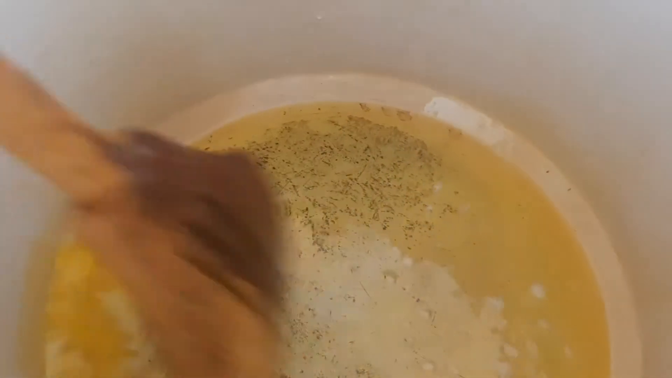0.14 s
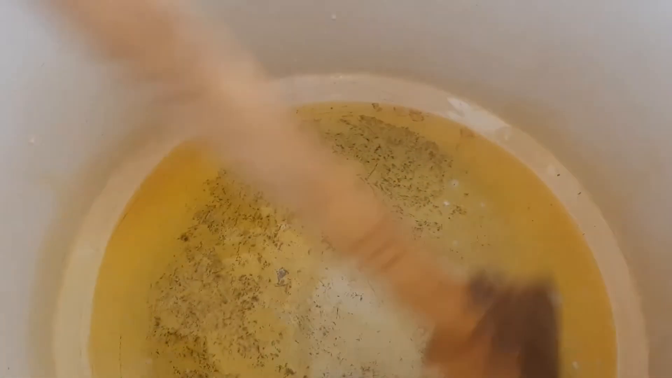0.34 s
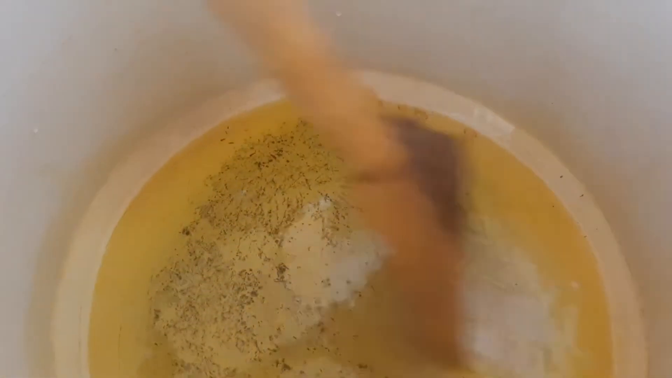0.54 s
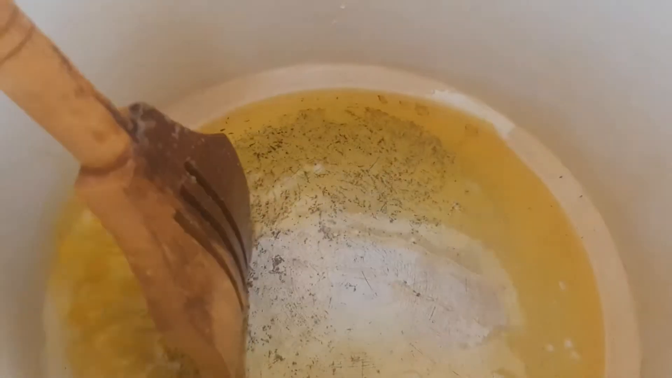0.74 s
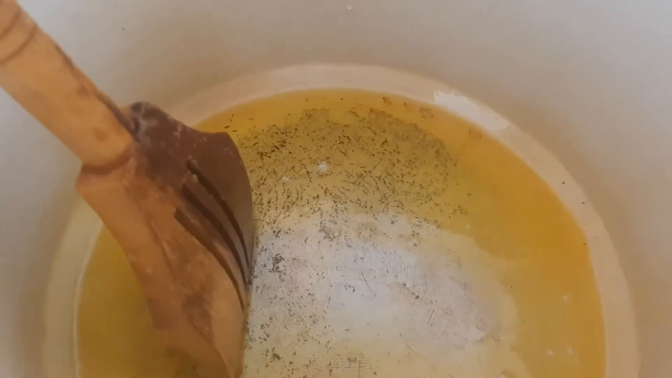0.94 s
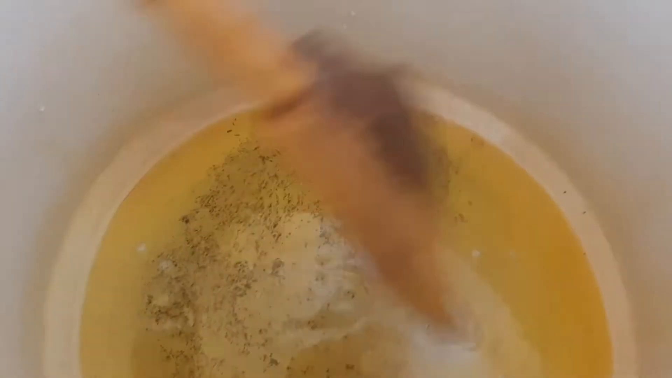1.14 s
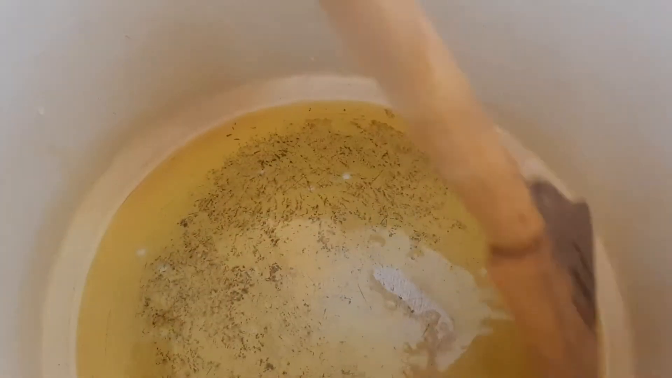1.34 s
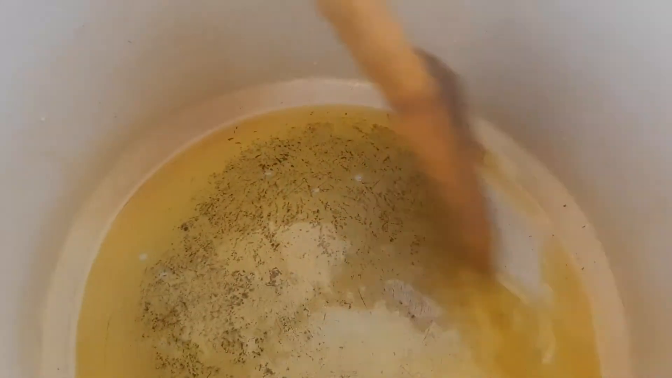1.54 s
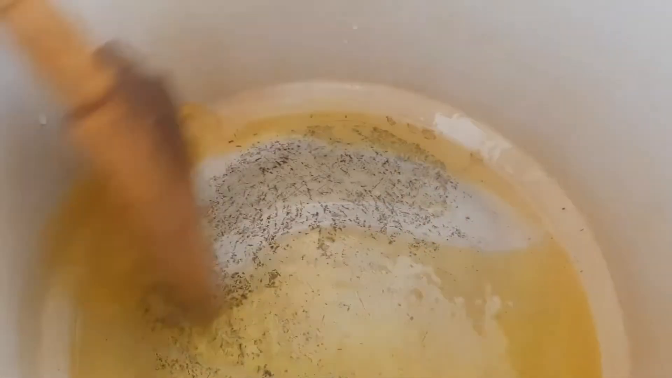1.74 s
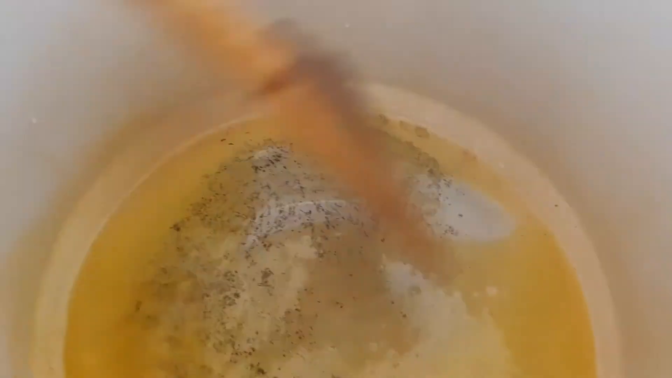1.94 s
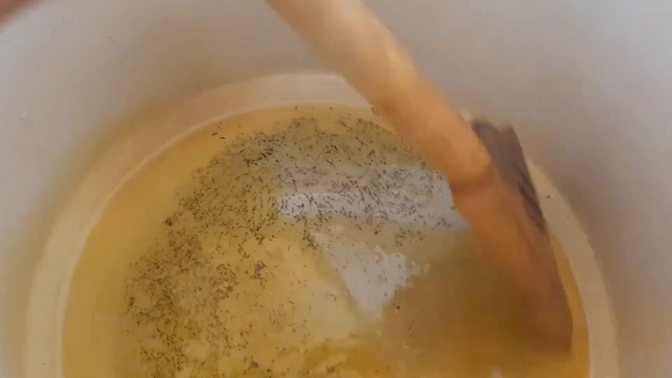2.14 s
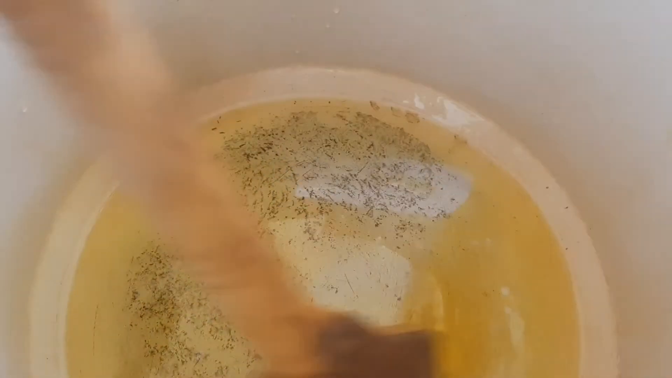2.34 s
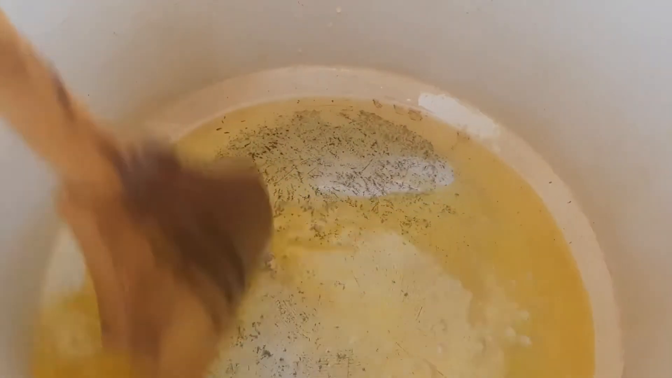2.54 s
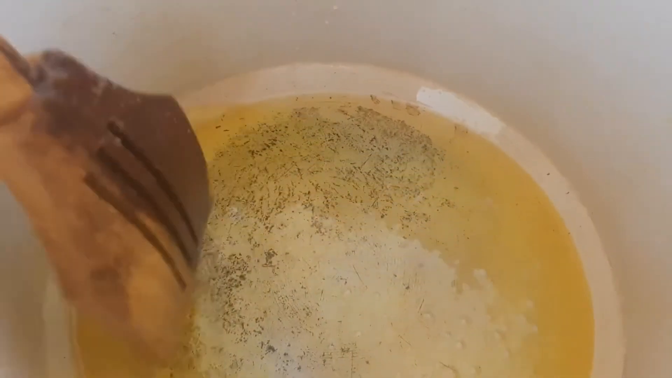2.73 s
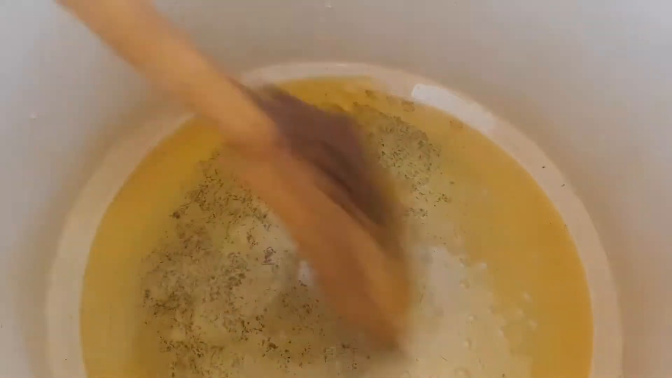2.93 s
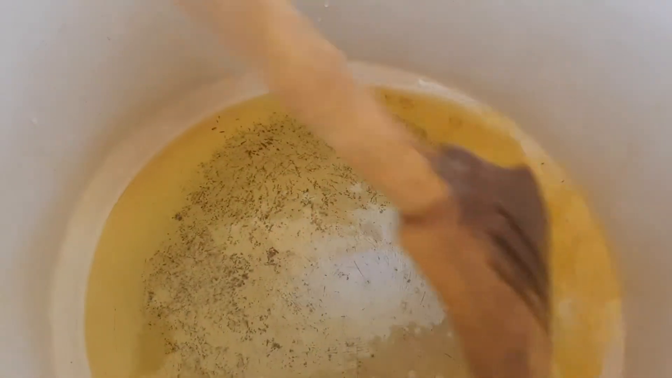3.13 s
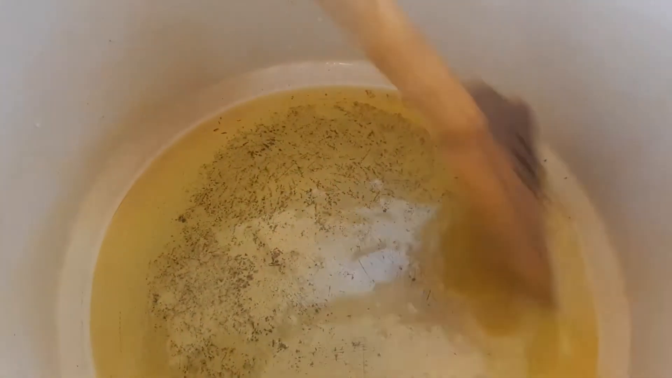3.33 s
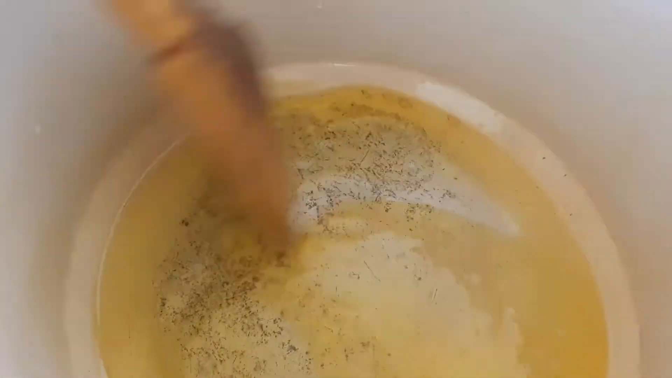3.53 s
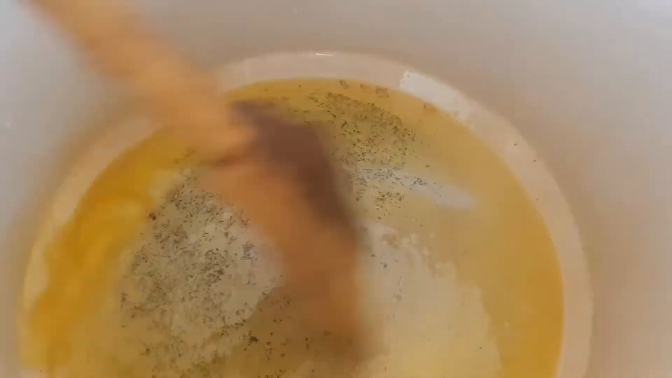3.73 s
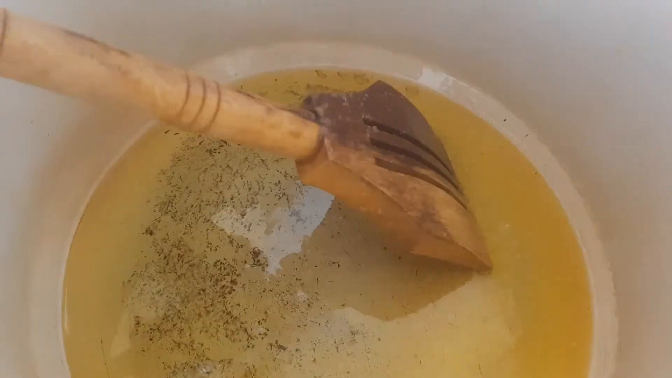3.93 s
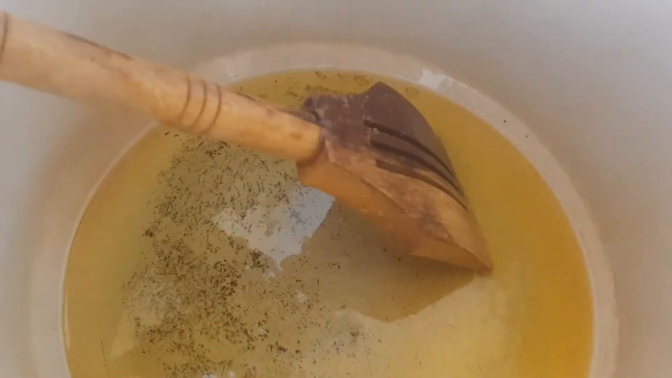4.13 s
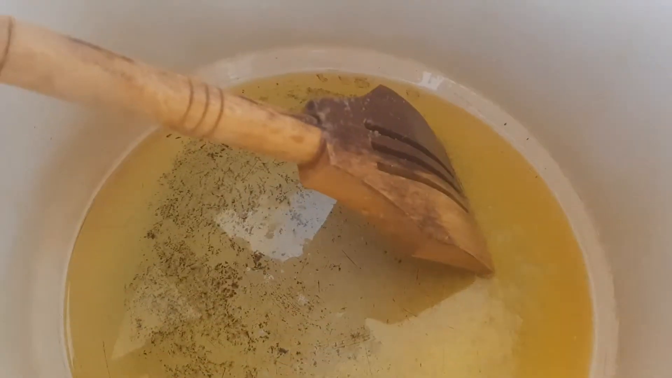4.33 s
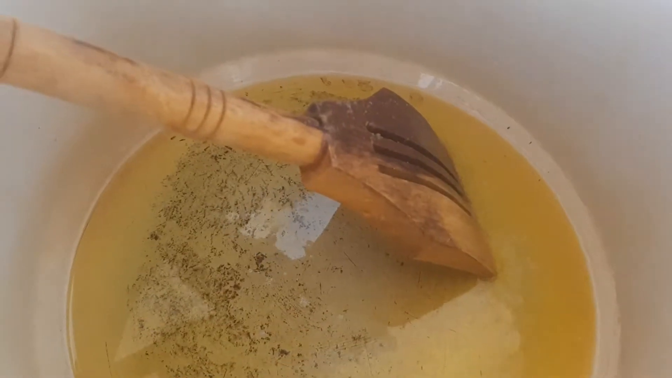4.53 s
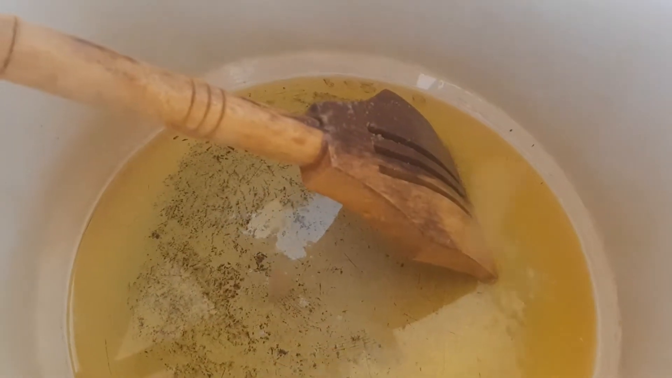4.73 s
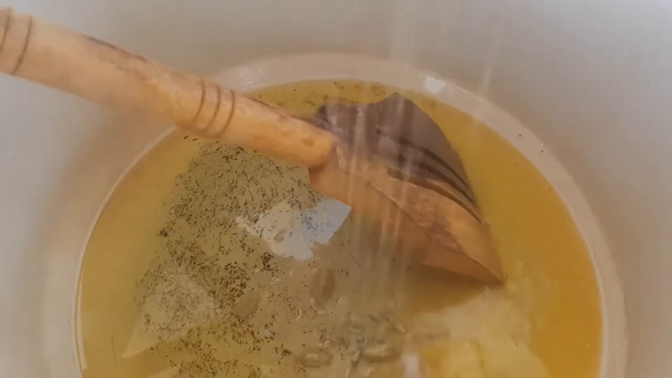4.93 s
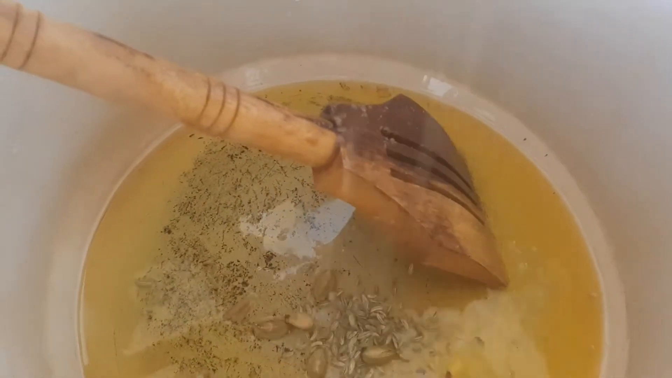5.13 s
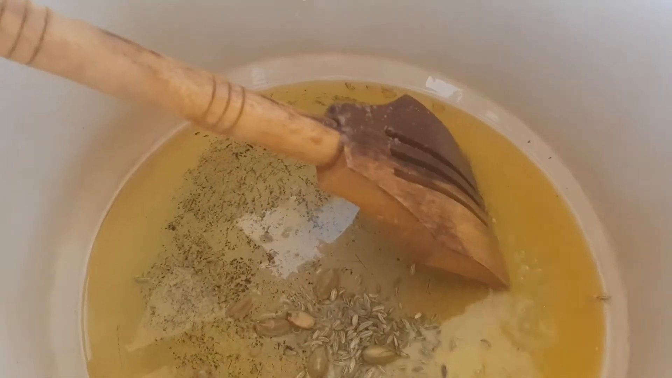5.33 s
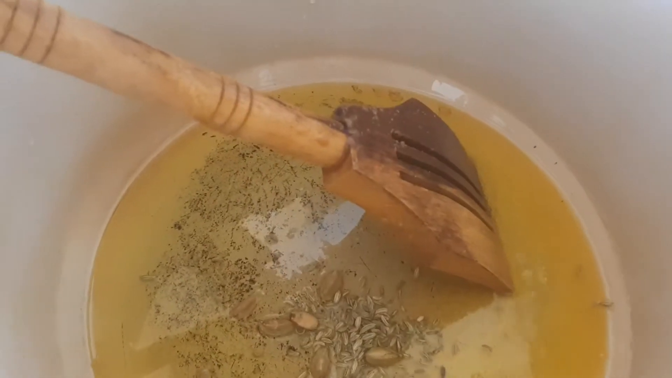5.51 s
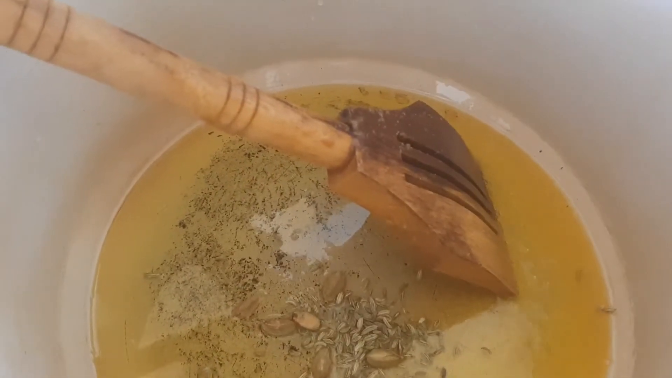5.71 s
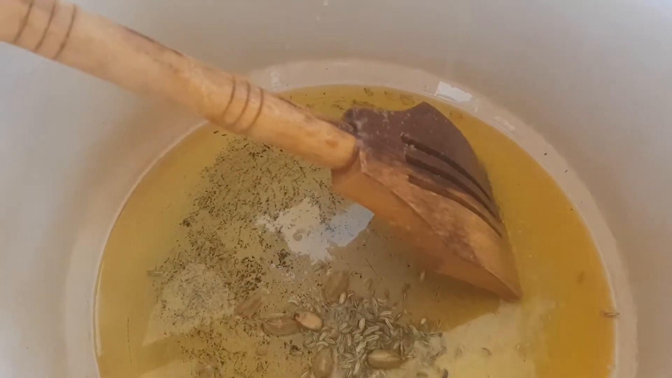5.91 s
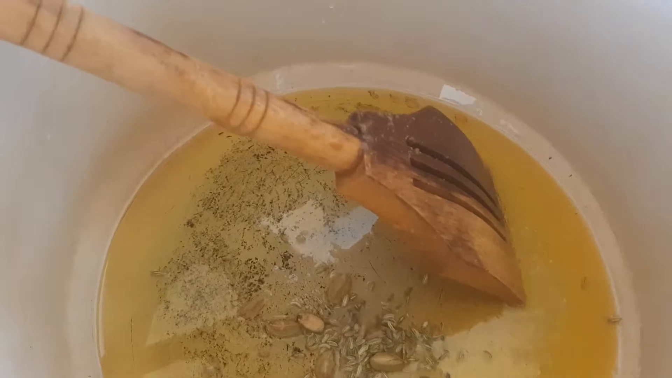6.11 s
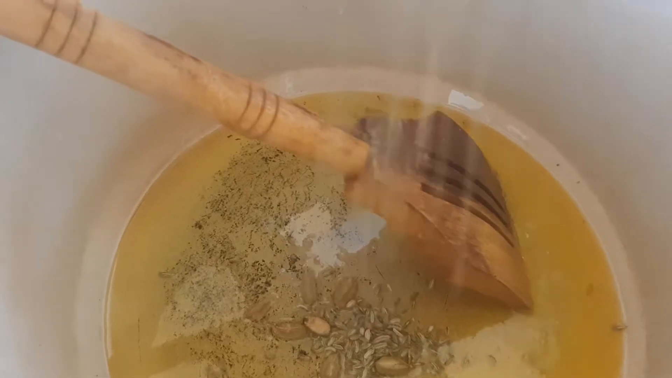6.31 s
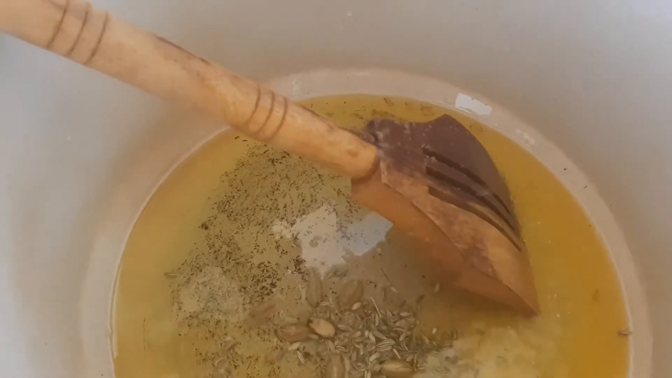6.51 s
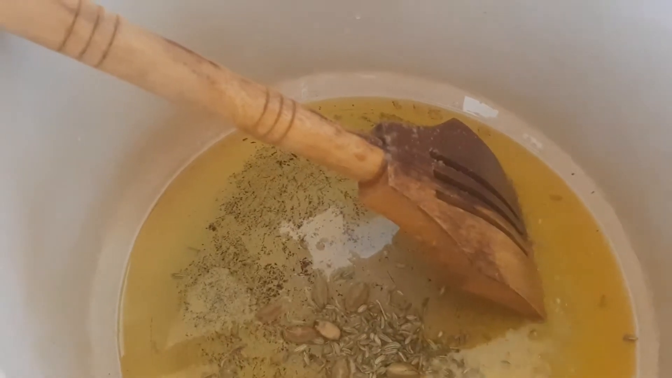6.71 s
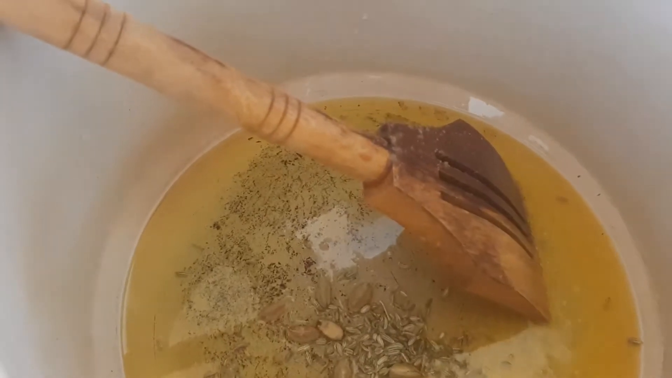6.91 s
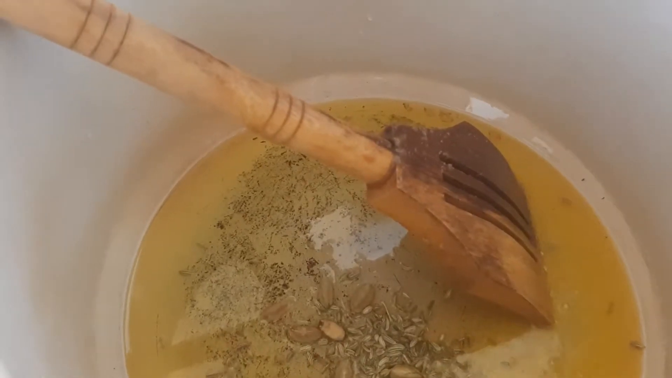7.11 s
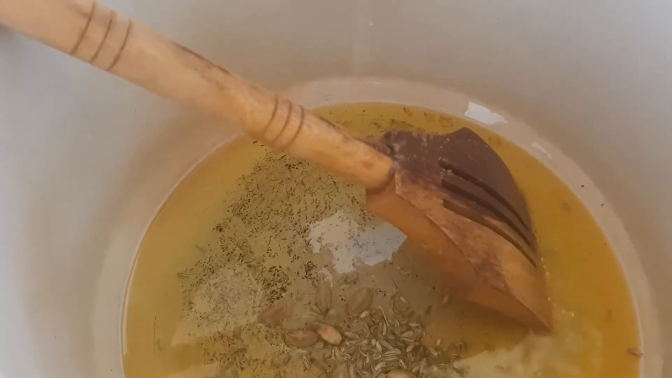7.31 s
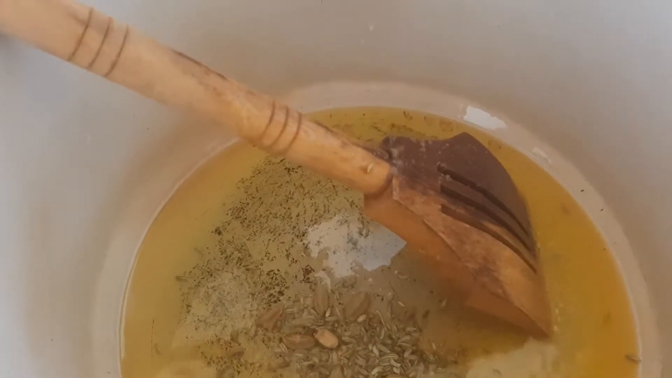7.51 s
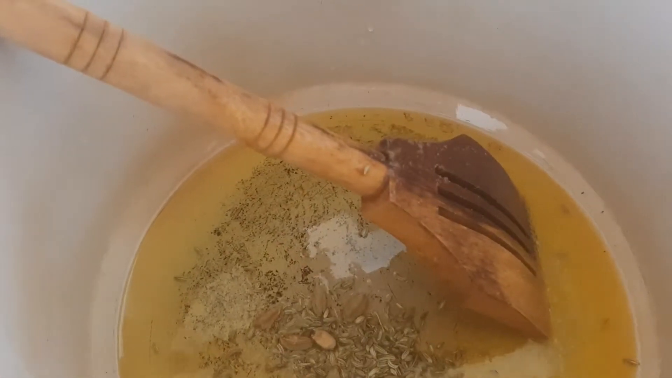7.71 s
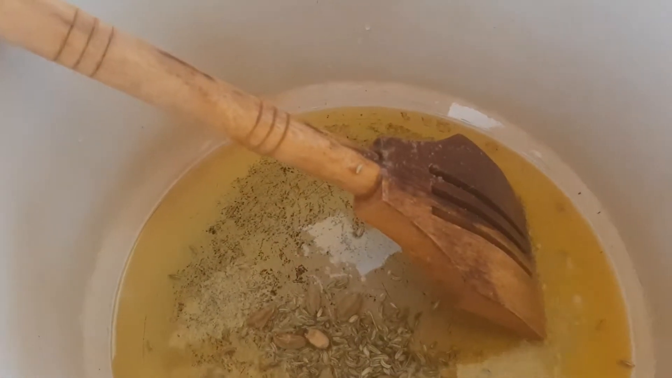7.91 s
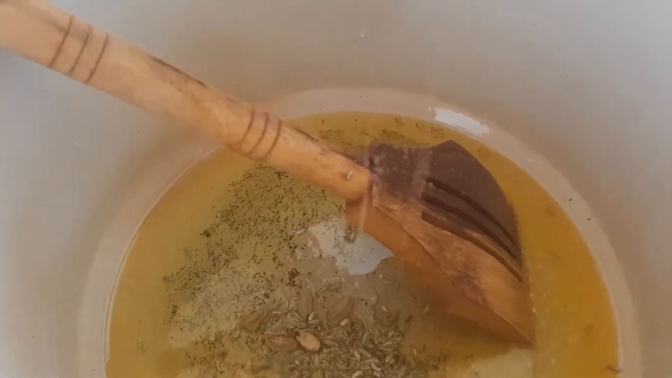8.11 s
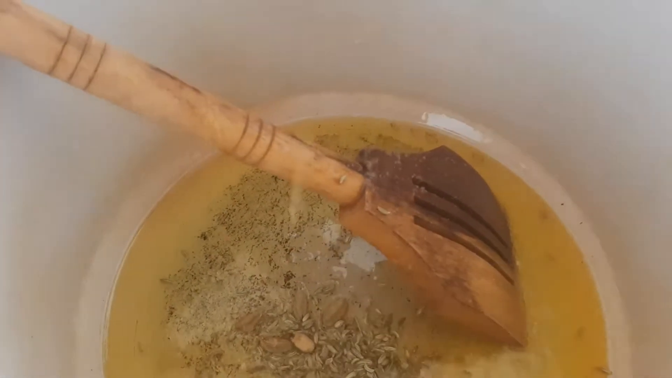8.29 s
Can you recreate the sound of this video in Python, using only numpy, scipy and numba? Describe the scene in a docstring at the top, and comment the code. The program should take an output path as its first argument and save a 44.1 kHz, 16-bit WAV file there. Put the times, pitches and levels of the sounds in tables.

```python
"""Hot fat fries in a deep pot under a two-port microphone: bubbles are short sine grains, droplets are tiny ticks,
and both make the air in the pot sing. At first a wooden spatula scrapes (uneven slips) and knocks the pot
(short pushes into its ringing modes). At about 4 s it is laid down and whole seeds are thrown into the fat, which
brings dense spitting. Then the frying goes on with strong pops. Low filtered noise rumbles underneath throughout."""
import sys
import numpy as np
from scipy import signal
from scipy.fft import rfft, irfft
from scipy.io import wavfile
from scipy.ndimage import uniform_filter1d
from numba import njit

SR = 44100
rng = np.random.default_rng(int(sys.argv[2]) if len(sys.argv) > 2 else 0)


def persist_wave(psi):
    """Save psi, clipped to +-1, as 16-bit WAV."""
    counts = np.round(np.clip(psi, -1, 1) * 32767).astype(np.int16)
    wavfile.write(sys.argv[1], SR, np.atleast_2d(counts).T)


N = 368235
T, HZ = np.arange(N) / SR, np.fft.rfftfreq(N, 1 / SR)  # time in seconds, frequency in Hz

# Heat of the frying. Each row: time in seconds, bubbling level in dB before a fixed trim.
FRYING_HEAT = [(0.0, -28.5), (0.3, -35), (0.56, -31.5), (0.65, -36.5), (0.8, -34), (1.35, -33),
               (1.42, -30.5), (1.63, -27), (1.67, -39), (2.56, -31), (2.9, -34.5), (3.44, -36), (3.51, -40),
               (3.79, -36), (3.84, -43), (3.9, -36.5), (4.04, -36.5), (4.07, -27), (4.72, -29), (5.37, -34),
               (6.35, -30.5), (7.3, -31.5), (7.44, -28), (8.35, -26)]
# Usual size of the bubbles, heard as pitch. Each row: time in seconds, pitch in Hz.
BUBBLE_PITCH = [(0, 4575), (1.0, 4695), (1.5, 3840), (4.0, 4067), (4.4, 3400), (5.2, 3720), (7, 3926),
                (8.35, 3713)]
# The largest bubbles. Each row: start in seconds, strength in dB, pitch in Hz, crackle after it in dB over the pop.
BIG_POPS = [(0.004, -13.5, 4840, -19.5), (0.0266, -17, 4450, -8), (0.0592, -29, 4250, -26),
            (0.1633, -14, 4200, -22), (0.186, -16, 4680, -28), (0.3218, -22, 2580, -3.5),
            (0.361, -8.5, 4520, -28), (0.41, -12, 4500, -30), (0.435, -13, 4290, -34),
            (0.458, -19, 4260, -31), (0.4839, -13.5, 4200, -9.5), (0.546, -16, 3920, -27),
            (0.679, -20, 4260, -5.5), (0.692, -14, 3800, -20), (0.798, -16, 5200, -11.5),
            (0.826, -18, 2430, -22), (0.846, -18, 4870, -31), (0.8767, -24, 3810, -15),
            (0.946, -28, 2000, -30), (1.0044, -19.5, 2310, -9), (1.0866, -14, 4760, -29),
            (1.24, -18, 3000, -14), (1.3092, -20, 2490, -8), (1.3993, -18, 3810, -27),
            (1.4169, -15, 3350, -23), (1.458, -18, 3850, -19), (1.4879, -21, 4100, -23),
            (1.8018, -19.5, 3420, -13.5), (1.929, -19.5, 3860, -22), (2.1646, -17, 4430, -32),
            (2.248, -16.5, 3800, -31), (2.3053, -21, 3270, -2), (2.34, -10, 5600, -17),
            (2.4461, -15, 3770, -21), (2.5304, -13, 4360, -25), (2.62, -22, 3800, -11),
            (2.6566, -18, 4200, -9.5), (2.7613, -15, 4730, -12), (2.8679, -22, 4320, -6),
            (2.969, -18, 2450, -5.5), (3.059, -9, 2340, -18.5), (3.1375, -16, 3820, -17),
            (3.2222, -16, 5460, -14.5), (3.2712, -13, 4520, -24), (3.3049, -18, 2940, -30),
            (3.3672, -26, 4230, -3), (3.4223, -21, 2370, -5), (3.7687, -18, 3400, -20),
            (3.8865, -12.5, 5980, -17), (3.923, -14, 5750, -33), (3.9423, -17.5, 3730, -26),
            (4.0608, -14.5, 3230, -17), (4.4029, -20, 2236, -30), (4.6198, -14.5, 4350, -21),
            (4.6492, -14, 4240, -17), (4.71, -7, 3080, -28), (4.7417, -10, 4200, -36),
            (4.754, -17, 4830, -26), (4.765, -10, 3440, -34), (4.862, -22.5, 5170, 0),
            (4.9912, -12.5, 4170, -25), (5.2336, -14.5, 4400, -25), (5.591, -16.5, 3817, -26),
            (5.6872, -12, 3600, -25), (5.7777, -15.5, 4520, -30), (5.843, -13.5, 3820, -30),
            (5.865, -14, 3960, -31), (6.0838, -21, 2915, -25), (6.1123, -17, 3720, -27),
            (6.1923, -20, 2640, -3), (6.275, -13, 4000, -16), (6.3733, -12.5, 4680, -17),
            (6.398, -7.5, 3720, -40), (6.437, -14, 4610, -26), (6.448, -12, 3500, -25),
            (6.5313, -17, 4360, -29), (6.583, -16, 4700, -28), (6.6027, -13.5, 4630, -15),
            (6.6641, -21, 4700, -13), (6.72, -13.5, 4000, -12), (6.8386, -12, 3870, -25),
            (6.8575, -12.5, 3880, -34), (6.993, -8.5, 3560, -24), (7.0059, -4.5, 3690, -25),
            (7.0817, -11, 3880, -22), (7.132, -12, 4500, -14), (7.1788, -18, 3670, -27),
            (7.2126, -16, 3670, -8), (7.2711, -23.5, 3650, -7), (7.3534, -14, 3810, -23),
            (7.402, -10, 3850, -34), (7.4495, -4.5, 3630, -21), (7.4846, -11, 3700, -21),
            (7.5629, -6.5, 3900, -23), (7.6517, -13, 4000, -5.5), (7.693, -5, 3910, -31),
            (7.776, -18, 3820, -20), (7.8131, -10, 3360, -11), (7.87, -8, 5270, -15.5),
            (7.984, -2, 3740, -21.5), (8.069, -15, 3520, -17), (8.1401, -16, 2590, -15),
            (8.177, -5.5, 3680, -39), (8.309, -4, 3880, -22)]
# Big droplets bursting. Each row: start in seconds, strength in dB.
BIG_SPITS = [(1.855, -39), (2.05, -39), (2.386, -38), (2.656, -36), (2.726, -38), (2.997, -42),
             (3.575, -42.5), (3.941, -42), (4.7727, -21.5), (4.8615, -26.5), (4.878, -30), (4.894, -31),
             (4.9442, -27), (4.956, -34), (4.967, -32.5), (4.993, -31), (5.055, -38), (5.118, -34.5),
             (5.152, -38), (5.268, -38.5), (6.1383, -36.5), (6.6564, -44), (7.31, -37.5), (7.415, -36.5),
             (8.2, -34), (8.328, -41)]
# Dense spitting: fat swept onto hot metal, seeds landing, wet seeds bursting.
# Each row: moment of full strength in seconds, hold in seconds, strength in dB.
SPITTING_SPELLS = [(1.56, 0.098, -38), (1.72, 1.14, -47), (2.36, 0.058, -38.5), (3.01, 0.12, -48),
                   (3.41, 0.08, -43), (4.22, 0.27, -50), (4.78, 0.041, -39.5), (4.86, 0.049, -36.5),
                   (4.97, 0.21, -42), (6.39, 0.079, -41.5), (7.36, 0.12, -44.5), (8.05, .3, -49)]
# The spatula drags over the base. Each row: moment of full level in seconds, hold in seconds, level in dB.
SPATULA_SCRAPES = [(1.51, 0.073, -39), (1.65, 0.1, -41.5), (2.098, 0.023, -45), (2.293, 0.1, -46),
                   (2.946, 0.045, -40), (3.38, 0.051, -47), (3.497, 0.14, -48.5)]
# Blows on the pot. Each row: start in seconds, strength in dB, contact in milliseconds, boost of the modes
# above 500 Hz in dB, boost of the thud below 300 Hz in dB. Both boosts depend on where the blow lands.
POT_KNOCKS = [(0.342, -28, 4, 7, 4), (0.369, -13.5, 1.13, 8.5, 14), (0.516, -30.5, 0.3, 8, 7),
              (1.418, -22, 1.93, -11, 12), (1.428, -19.5, 2.47, 0, 13.5), (1.493, -20, 1.3, 13, 20),
              (1.759, -30.5, 0.28, 21, 5), (2.067, -24.5, 1.15, 11, 17), (2.157, -23.5, 1.63, 4, 20.5),
              (2.3, -29.5, 0.35, 10, 12), (2.339, -30.5, 3.1, 14, 18), (2.887, -2.5, 0.27, -3.5, 4.5),
              (2.932, -23, 0.44, -15, -11), (3.317, -27, 2.04, 6, 14), (3.489, -32, 0.52, -3, -5),
              (3.563, -24, 0.17, 8, 0), (4.009, -10, 1.75, 13, -1), (4.022, -17.5, 0.38, -7, 0)]
# Modes of the struck pot. Each row: pitch in Hz, strength in dB, time to fall by 60 dB in seconds.
POT_MODES = [(95, -14, 0.097), (157, -2.5, 0.18), (263, 1.5, 0.092), (378, -1, 0.07), (426.3, 22, 0.074),
             (584, 6.5, 0.1), (648.3, 13.5, 0.14), (779, 11.5, 0.067), (949, 15.5, 0.1), (998, 13, 0.12),
             (1090, -17, 0.05), (1493, 8, 0.11), (1730, 4.5, 0.12), (2204, 12, .05)]
# Air modes in step at both ports. Each row: pitch in Hz, width in Hz, level in dB over the direct sound.
AIR_IN_STEP = [(437, 45, 6.5), (665, 70, -6), (747, 43, -3.5), (996.6, 42, 10), (1754.6, 32.3, 9.5),
               (2265, 35, 4), (3800, 39, 1), (4620, 1220, -4), (7780, 700, -6.5)]
# Air modes that reach the ports in opposition. Each row: pitch in Hz, width in Hz, level in dB over the direct sound.
AIR_OPPOSED = [(366, 110, -2), (968, 25, 10), (1517, 30, 12), (1828, 15, 17.5), (1960, 38, 15.5),
               (2850, 140, 5)]
# How much the two ports differ. Each row: frequency in Hz, gain in dB.
PORT_DIFFERENCE = [(60, -12), (400, -12), (700, -8.5), (1300, -0.5), (2400, -3.5), (4400, 4.5),
                   (8000, -1.5), (15000, -4)]
# Colour of the bubbles' thumps. Each row: frequency in Hz, gain in dB.
THUMP_COLOUR = [(60, -60), (150, -55), (230, -4.5), (320, -5.5), (500, -3.5), (800, -1), (1300, 4),
                (2500, 16.5), (6000, -21)]
# Colour of the spitting. Each row: frequency in Hz, gain in dB.
SPIT_COLOUR = [(60, -66), (300, -10.5), (2000, -8.5), (5000, -7), (7600, -2.5), (9000, -9), (11500, -1),
               (15500, -5)]
# Bass rumble of stove and stirring. Each row: time in seconds, level in dB of the sound shared by both ports.
RUMBLE_LEVEL = [(0, -56.5), (3.5, -57), (6, -71.5), (8.35, -67.5)]
# Colour of the rumble. Each row: frequency in Hz, gain in dB.
STOVE_COLOUR = [(20, -31), (60, -16.5), (100, -1.5), (160, -9.5), (260, -4), (400, -31)]
# Wavering hum lines. Each row: pitch in Hz, width in Hz, level in dB over the rumble.
HUM_LINES = [(46, 8.1, 16), (138, 13, 10.5)]

POP_CYCLES, POP_RISE = 17.8, 0.94  # length of a big bubble's ring; swelling time over dying time
SPIT_UNDER_FRY_DB, SPRAY_DECAY_S = -19.5, 0.0039
FLARE_ATTACK_S, FLARE_FADE_DB_S = 0.018, 148
FLARE_BRIGHT_HZ = 6000  # dense spitting is brighter than the steady ticking
STIR_ENDS_S, SETTLE_S = 4.05, .05
STIRRED_FITS_DB, RESTING_FITS_DB = 4.5, -8.  # stirred fat erupts in fits, fat at rest fries more evenly
STIRRED_THUMP_DB, RESTING_THUMP_DB = -15.5, -10  # thumps against the frying heat
WANDER, WANDER_S = .007, .12  # scale of the random speed changes; how long each takes
SCRAPE_HZ, SCRAPE_GLIDE_OCT_S = 870, 0.74  # centre of the slips' pitches; glide of the rings in octaves per second
SCRAPE_ATTACK_S, SCRAPE_FADE_DB_S = 0.027, 156
CRACK_DB, CRACK_S = -12, 0.018  # rough clack of wood at each blow, against the ring's peak; its decay
TOP_HZ = 15900


def bubbling(busy):
    """Steam bubbles ring for a few cycles at a pitch set by their size, over a finer fizz."""
    hz = np.interp(T, *np.transpose(BUBBLE_PITCH))
    # neighbouring bubbles are alike, so the fizz keeps one pitch shift for 1024 samples, then hops
    hop_octaves = np.repeat(np.maximum(rng.standard_normal(N // 1024 + 1), -.4), 1024)[:N]
    fizz_hz = 0.9145 * hz * 2 ** (0.336 * hop_octaves)
    bubbles = scatter(busy, rate=360, hz=hz, octaves=0.2654, cycles=13., spread_db=4.5, rise=1.0, burst_db=6.5)
    fizz = scatter(busy, rate=2400, hz=fizz_hz, octaves=0.4334, cycles=5.87, spread_db=1.5, rise=0.18, burst_db=16.)
    sizzle = steady(in_pot(bubbles + undb(-6.5) * fizz), seconds=0.096)
    return sizzle * curve(FRYING_HEAT) * undb(-3.0)


def pops(count=40, trail_ms=13.0, octaves=0.22):
    """The largest bubbles ring clearly and leave a trail of small crackles."""
    s, db, hz, trail_db = np.array(BIG_POPS).T[:, :, None]
    g = rng.standard_normal((2, len(s), count))
    e = rng.exponential(1, (len(s), count))
    pop_start = (s[:, 0] * SR).astype(np.int64)
    pop_place = 0.25 + 0.6 * g[1, :, 0]
    pair = grains(np.zeros((2, N)), pop_start, hz[:, 0], POP_CYCLES + 0 * s[:, 0], undb(db[:, 0]), pop_place, POP_RISE)
    # later crackles are weaker
    start = ((s + e * trail_ms / 1000) * SR).astype(np.int64).ravel()
    pitch = np.clip(1.104 * hz * 2 ** (octaves * g[0]), 300, .4 * SR).ravel()
    size = (undb(db + trail_db - 7.8 * e) * g[1]).ravel()
    place = 0.11 + 0.92 * g[1, :, ::-1].ravel()
    pair = grains(pair, start, pitch, 3.5 + 0 * pitch, size, place, 0.17)
    return in_pot(pair) * undb(5.0)


def spitting(busy):
    """Droplets burst as short ticks; the big ones leave a short spray of hiss."""
    ticks = scatter(busy, rate=7300, hz=8560.0, octaves=0.61, cycles=2.2, spread_db=1.0, rise=0.12,
                    burst_db=13.5, roam=0.63)
    ticks = steady(in_pot(ticks, colour(SPIT_COLOUR)), seconds=0.2) * undb(3.0)
    bright = signal.sosfilt(signal.butter(1, FLARE_BRIGHT_HZ, "high", fs=SR, output="sos"), ticks)
    ticks = ticks * curve(FRYING_HEAT) * undb(SPIT_UNDER_FRY_DB)
    ticks = ticks + bright * spells(SPITTING_SPELLS, FLARE_ATTACK_S, FLARE_FADE_DB_S)
    spray, t = np.zeros(N + SR), T[:SR // 8]
    for s, db in BIG_SPITS:
        spray[int(s * SR):][:len(t)] += undb(db) * np.minimum(t / 0.002, 1) * np.exp(-t / SPRAY_DECAY_S)
    mid, other = rng.standard_normal((2, N))
    hiss = spray[:N] * np.array([mid, .4 * mid + 1.23 * other])
    return ticks + undb(17.0) * in_pot(hiss, colour(SPIT_COLOUR))


def drone(busy):
    """Dense uneven thumps of big bubbles on the base set the low modes of the pot ringing."""
    thumps = scatter(busy, rate=900, hz=880.0, octaves=0.87, cycles=0.85, spread_db=3.0, rise=0.21,
                     burst_db=9., roam=1.0)
    thumps = steady(wander(in_pot(thumps, colour(THUMP_COLOUR))), seconds=0.11)
    return thumps * curve(FRYING_HEAT) * undb(stirred(STIRRED_THUMP_DB, RESTING_THUMP_DB))


def scrapes(busy):
    """The dragged blade slips unevenly; some slips ring the pot's modes, a little higher as the stroke goes on."""
    slips = scatter(busy, rate=1500, hz=SCRAPE_HZ, octaves=0.48, cycles=2.4, spread_db=3.5, rise=0.13,
                    burst_db=5., roam=0.77)
    starts = np.array(SPATULA_SCRAPES)[:, 0]
    since = T - starts[np.maximum(np.searchsorted(starts, T) - 1, 0)]
    glide = 2 ** (SCRAPE_GLIDE_OCT_S * np.clip(since - .05, -.05, .1))
    modes = rng.choice([hz for hz, _, _ in POT_MODES if hz > 300], N) * glide
    rings = scatter(busy, rate=450, hz=modes, octaves=0.021, cycles=25.0, spread_db=2.5, rise=.3, burst_db=4.)
    rings = signal.sosfilt(signal.butter(2, 1300., fs=SR, output="sos"), rings)
    stroke = steady(in_pot(slips) + undb(1.0) * rings, seconds=0.047)
    return stroke * spells(SPATULA_SCRAPES, SCRAPE_ATTACK_S, SCRAPE_FADE_DB_S)


def knocks():
    """Each blow is a short push into the pot's modes; a longer contact sounds duller."""
    out, t = np.zeros(N + SR), np.arange(SR // 3) / SR
    hz, mode_db, t60 = np.array(POT_MODES).T[:, :, None]
    low = hz[:, 0] < 300
    chance = rng.standard_normal((len(POT_KNOCKS), 2, len(POT_MODES), 1))
    wood = signal.butter(2, [600., 2600.], "band", fs=SR, output="sos")
    clacks = signal.sosfilt(wood, rng.standard_normal((len(POT_KNOCKS), len(t))))
    # the first swings are strongest: the fat and the wood soak up the blow at once
    first = 1 + 0.57 * np.exp(-t / 0.0026)
    # a small pot radiates no bass below its modes; the lowest swell in gently
    no_bass = signal.butter(4, 300., "high", fs=SR, output="sos")
    swell = 1 - np.exp(-t / np.where(hz < 200, 0.008, .003))
    scatter_db, detune = 2.5, .008  # no two blows are quite alike
    for (s, db, ms, high_db, thud_db), (e, f), clack in zip(POT_KNOCKS, chance, clacks):
        strength = undb(mode_db + scatter_db * e + high_db * (hz > 500) + thud_db * (hz < 300))
        swing = np.sin(2 * np.pi * hz * (1 + detune * f) * t)
        modes = strength * swing * np.exp(-np.log(1000) * t / t60)
        ring = signal.sosfilt(no_bass, modes[~low].sum(axis=0) * first) + (modes * swell)[low].sum(axis=0)
        ring = ring / np.abs(ring).max() + undb(CRACK_DB) * clack * np.exp(-t / CRACK_S)
        contact = np.hanning(int(np.clip(ms, .1, 5) * SR / 1000) + 3)
        ring = np.convolve(ring, contact)
        i = int(s * SR)
        out[i:i + len(ring)] -= ring * undb(db) / np.abs(ring).max()
    mid = out[:N]
    side = irfft(1j * rfft(mid) * colour(PORT_DIFFERENCE), N) * 0.9
    return np.array([mid, side])


def rumble():
    """Low noise with wavering hum lines, nearly the same at both ports."""
    noise = irfft(rfft(rng.standard_normal((2, N))) * colour(STOVE_COLOUR) * np.abs(air(HUM_LINES)), N)
    return noise / noise[0].std() * [[1], [undb(-16.0)]] * curve(RUMBLE_LEVEL)


def kitchen(pair, t60, wet_db):
    """A short diffuse tail of fading noise from the walls of the room."""
    t = np.arange(SR // 3) / SR
    tail = rng.standard_normal((2, len(t))) * np.exp(-np.log(1000) * t / t60) * (t > .004)
    tail = tail / np.sqrt(np.sum(tail[0] ** 2))
    return pair + undb(wet_db) * signal.fftconvolve(pair, tail, axes=1)[:, :N]


def in_pot(pair, tint=1):
    """The pot's air colours mid and side with different modes; the ports' difference runs a quarter cycle ahead."""
    shared = air(AIR_IN_STEP)
    opposed = 1j * air(AIR_OPPOSED) * colour(PORT_DIFFERENCE)
    return irfft(rfft(pair) * tint * [shared, opposed], N)


def air(modes):
    """Direct sound plus ringing resonances, as a gain over frequency."""
    return 1 + sum(undb(db) * 1j * w * HZ / (hz ** 2 - HZ ** 2 + 1j * w * HZ) for hz, w, db in modes)


def wander(pair):
    """Play the sound a little faster or slower by turns, so its resonances drift as steam and fat move."""
    k = int(WANDER_S * SR)
    drift = uniform_filter1d(np.repeat(rng.standard_normal(N // k + 1), k)[:N], k)
    place = np.arange(N) + np.cumsum(WANDER * (drift - drift.mean()))
    return np.array([np.interp(place, np.arange(N), v) for v in pair])


def bursts(rate=40, decay_ms=10., pop_db=3.):
    """How busy the fat is: random eruptions and the big pops, each fading."""
    kicks = (rng.random(N) < rate / SR) * np.minimum(rng.exponential(1, N), 2.5)
    fits = undb(stirred(STIRRED_FITS_DB, RESTING_FITS_DB))
    kicks[(np.array(BIG_POPS)[:, 0] * SR).astype(int)] += undb(pop_db)
    soft_kicks = uniform_filter1d(kicks * fits, size=SR // 300)
    return signal.lfilter([1], [1, -np.exp(-1000 / (decay_ms * SR))], soft_kicks)


def stirred(moving, resting):
    """One value while the spatula moves, another once it is laid down."""
    return np.interp(T, [STIR_ENDS_S - SETTLE_S, STIR_ENDS_S + SETTLE_S], [moving, resting])


def spells(rows, attack_s, fade_db_s):
    """Gain of spells that rise up to their given moment, hold and fade."""
    power = 0
    for s, length, db in rows:
        rise = np.clip((T - s) / attack_s + 1, 0, 1)
        fade_db = fade_db_s * np.clip(T - s - length, 0, 2)
        power = power + (rise * undb(db - fade_db)) ** 2
    return np.sqrt(power)


def scatter(busy, rate, hz, octaves, cycles, spread_db, rise, burst_db, place=0.03, roam=0.85):
    """A random shower of grains, rate per second on average: few are large, and they crowd in where it is busy."""
    u = rng.random((int(rate * N / SR), 3))
    g = rng.standard_normal((len(u), 3))
    crowd = np.cumsum(1 + undb(burst_db) * busy)
    start = np.searchsorted(crowd, u[:, 0] * crowd[-1])
    pitch = np.clip((hz * np.ones(N))[start] * 2 ** (octaves * g[:, 0]), 100, .4 * SR)
    size = undb(spread_db * np.minimum(-np.log(u[:, 1]), 3.5)) * np.sign(u[:, 2] - .5)
    lengths = cycles * np.exp(0.59 * g[:, 1])
    return grains(np.zeros((2, N)), start, pitch, lengths, size, place + roam * g[:, 2], rise)


@njit
def grains(out, start, hz, cycles, size, place, rise):
    """Sine grains that swell and die; place sets how much reaches the ports in opposition."""
    for k in range(len(start)):
        fall = np.exp(-3 * hz[k] / (cycles[k] * SR))
        z, swell, w = size[k], 0., 2 * np.pi * hz[k] / SR
        for i in range(min(out.shape[1] - start[k], int(2.5 * cycles[k] * SR / hz[k]))):
            swell += (1 - swell) * min(1., (1 - fall) / rise)
            z *= fall
            v = z * swell ** 2 * np.sin(w * i)
            out[0, start[k] + i] += v
            out[1, start[k] + i] += v * place[k]
    return out


def steady(pair, seconds):
    """Even out the slow level of a mid-side pair, so that the mid has an rms near 1."""
    width = int(seconds * SR)
    power = uniform_filter1d(uniform_filter1d(pair[0] ** 2, width), width)
    return pair / np.sqrt(power + 1e-12)


def colour(points):
    """Gain over frequency from points of Hz and dB."""
    hz, db = np.transpose(points)
    return undb(np.interp(np.log(HZ + 1), np.log(hz), db))


def curve(table):
    """Gain over time from rows of seconds and dB."""
    return undb(np.interp(T, *np.transpose(table)))


def undb(db):
    """Decibels to gain."""
    return 10 ** (np.asarray(db) / 20)


def scene():
    """Add up the sounds as mid (shared) and side (opposed), then turn them into left and right."""
    busy = bursts()
    # droplets and thumps follow the bubbles only in part
    spits = spitting(.4 * busy + bursts(rate=25, decay_ms=8., pop_db=-13.0))
    thumps = drone(.6 * busy + bursts(rate=25, decay_ms=15., pop_db=-12.))
    strokes = scrapes(bursts(rate=40, decay_ms=12., pop_db=-30.))
    fat = bubbling(busy) + pops() + spits + thumps + strokes
    # grains carry no deep bass
    fat = signal.sosfilt(signal.butter(3, 220., "high", fs=SR, output="sos"), fat)
    fat = kitchen(fat, t60=.18, wet_db=-11.)
    blows = kitchen(knocks(), t60=.22, wet_db=-11.)
    mid, side = fat + blows + rumble()
    return np.array([mid + side, mid - side])


def record(dry):
    """The recorder cuts the top: a steep low-pass filter."""
    return signal.sosfilt(signal.ellip(10, .2, 80, TOP_HZ, fs=SR, output="sos"), dry)


dry = scene()
out = record(dry)
persist_wave(out)
```